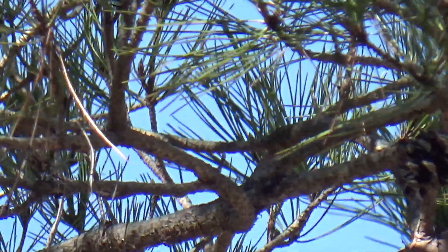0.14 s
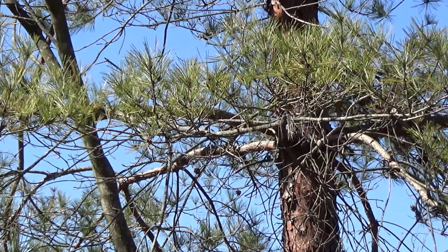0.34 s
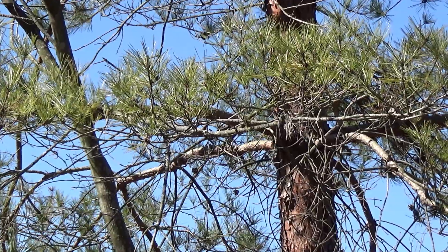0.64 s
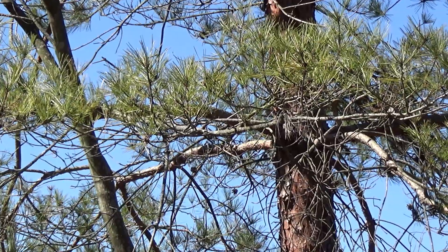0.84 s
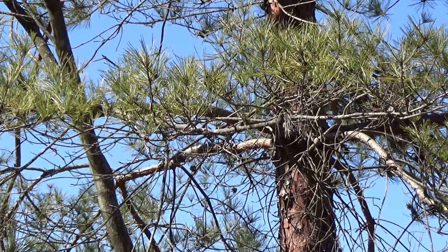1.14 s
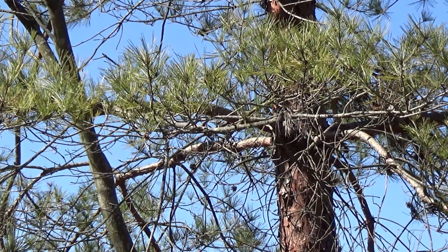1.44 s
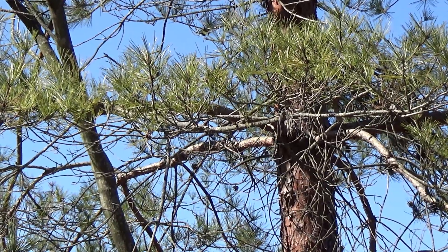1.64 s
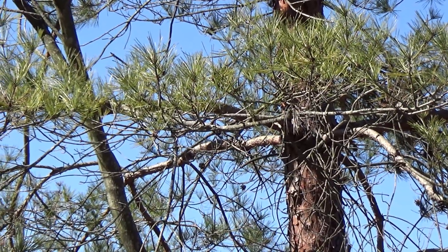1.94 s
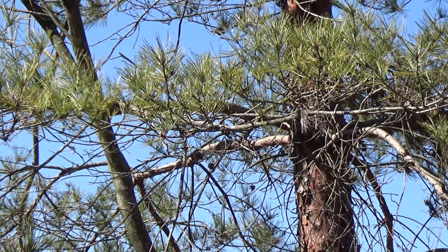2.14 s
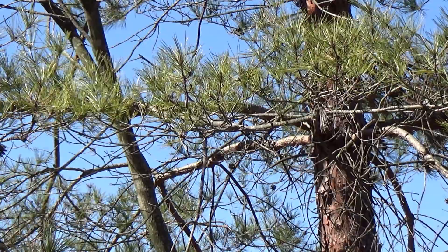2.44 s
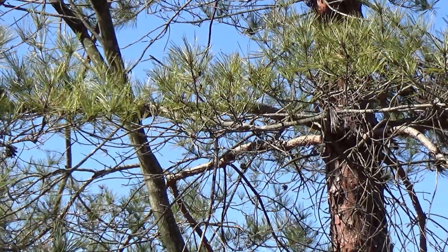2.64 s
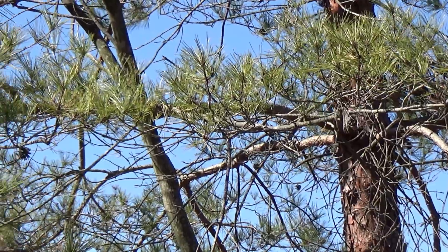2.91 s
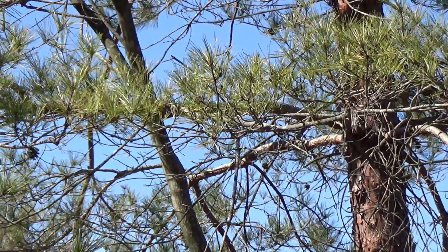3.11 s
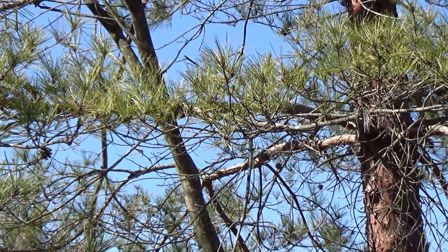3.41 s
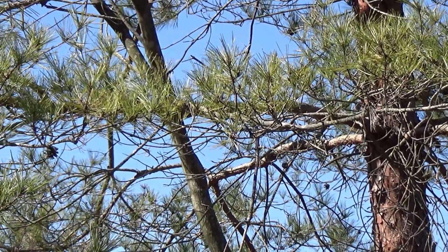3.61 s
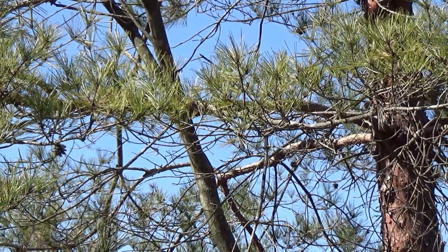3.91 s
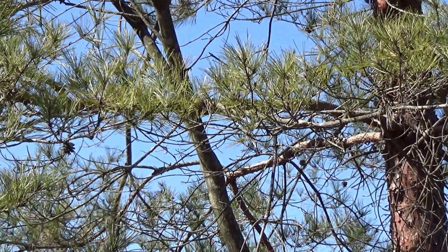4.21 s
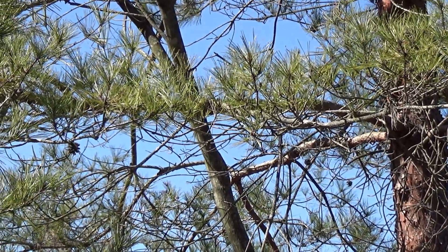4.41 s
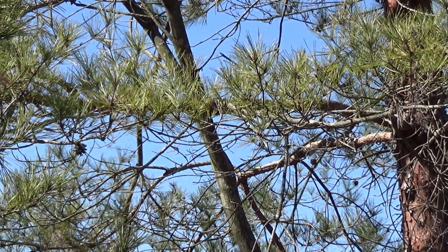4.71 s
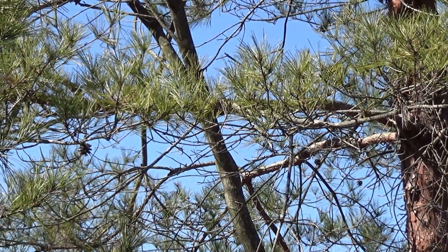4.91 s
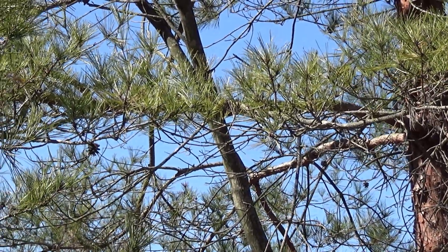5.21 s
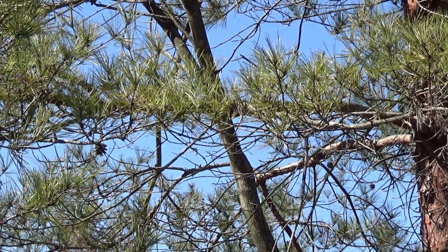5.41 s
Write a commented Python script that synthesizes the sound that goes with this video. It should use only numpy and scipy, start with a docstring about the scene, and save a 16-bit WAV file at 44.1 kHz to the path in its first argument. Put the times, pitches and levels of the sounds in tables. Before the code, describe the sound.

Tiny birds trade rough, very high buzzes and rapid sinking trills outdoors in pines, with thin whistles, faint crackles and a quiet airy background.

```python
"""Long-tailed tits calling in a pine

Two runs of buzzy notes from two fluttering voices, and trills of rising chips, each led by an arched note.
Thin gliding whistles, and one short slide up into an arched note, share the left side with the buzzes; fainter
trills and wavering tones come from further off. Trunks and boughs answer with spaced echoes and a decaying
noise tail. Needles rustle and crackle, and twigs tick as short noise bursts, over a soft roar of coloured
noise. A quarter second of silence comes first."""
import sys
import numpy as np
from scipy import signal
from scipy.fft import rfft, irfft
from scipy.io import wavfile
from scipy.ndimage import uniform_filter1d

SR = 44100
rng = np.random.default_rng(int(sys.argv[2]) if len(sys.argv) > 2 else 0)


def dump(signal):
    """Clip the signal to [-1, 1] and save it as 16-bit WAV at the path in sys.argv[1]."""
    limited = np.clip(np.atleast_2d(signal).T, -1, 1)
    pcm = np.round(limited * 32767).astype(np.int16)
    wavfile.write(sys.argv[1], SR, pcm)


N = 244755
TIME = np.arange(N) / SR  # s

# colour of the rustling needles: [f/Hz, relative level per Hz/dB]
RUSTLE_COLOUR = [(2000, -8), (4500, -7), (6500, -2.5), (8500, 3), (10000, -3), (12500, -11.5), (15700, -20)]
# how strongly the needles stir: [t/s, level/dB]
STIR_LEVEL = [(.3, -74), (1.1, -69.5), (1.5, -81), (2.5, -60.5), (3.4, -61.5), (4.9, -62.5), (5.15, -56),
              (5.32, -56), (5.5, -63.5)]


def amp(db):
    """Decibels to gain."""
    return 10 ** (np.asarray(db) / 20)


def evened(x):
    """Scales to an rms of one."""
    return x / np.sqrt(np.mean(x ** 2) + 1e-20)


def read(points, hz):
    """Reads a spectrum on a log-frequency axis."""
    f, value = np.transpose(points)
    return np.interp(np.log(hz + 1), np.log(f + 1), value)


def coloured(x, spectrum):
    """Filters a sound by a spectrum in dB."""
    gain = amp(read(spectrum, np.fft.rfftfreq(N, 1 / SR)))
    return irfft(rfft(x) * gain, N)


def level(curve):
    """Turns a curve of dB over time into a gain for every sample."""
    return amp(np.interp(TIME, *np.transpose(curve)))


def add(mix, s, sound):
    """Adds a sound into the mix at time s."""
    part = mix[round(s * SR):][:len(sound)]
    part += sound[:len(part)]


def wander(rate_hz):
    """Smooth random drift of rms one; a Gaussian low-pass thins it out above the rate."""
    hz = np.fft.rfftfreq(N, 1 / SR)
    spectrum = rfft(rng.standard_normal(N)) * np.exp(-(hz / rate_hz) ** 2)
    return evened(irfft(spectrum, N))


def progress(length):
    """Runs from 0 to 1 over a note of the given seconds."""
    return np.linspace(0, 1, round(length * SR))


def ramp(u, share):
    """Falls from 1 to 0 over the first share of a note, then stays at 0."""
    return np.maximum(1 - u / share, 0)


def tone(hz, overtone_db):
    """One side of the syrinx: almost a sine, with a trace of its octave."""
    phase = 2 * np.pi * np.cumsum(hz) / SR
    return np.sqrt(2) * (np.sin(phase) + amp(overtone_db) * np.sin(2 * phase))


def noise(spectrum, patchy_db):
    """Coloured stereo noise with drifting patches in time and pitch; bass and top are nearly mono."""
    # likeness of the two channels: [f/Hz, left-right correlation]
    likeness = [(60, .999), (125, 1), (250, 0.99), (500, 0.93), (1000, 0.77), (2000, 0.38), (4000, 0.52),
                (8000, 0.88), (12000, 1)]
    frames, hz = N // 256 + 5, np.fft.rfftfreq(1024, 1 / SR)
    a, b, c, d, patches = rng.standard_normal((5, frames, len(hz))).transpose(0, 2, 1)
    patches = uniform_filter1d(patches, size=14, axis=0)
    patches = evened(uniform_filter1d(patches, size=14, axis=1))
    same = np.clip(read(likeness, hz), -1, 1)[:, None]
    left = a + 1j * b
    right = same * left + np.sqrt(1 - same ** 2) * (c + 1j * d)
    z = np.array([left, right]) * amp(patchy_db * patches)
    white = signal.istft(z, nperseg=1024, noverlap=768)[1][:, :N]
    return evened(coloured(white, spectrum))


def outdoors(hiss_db=-66, crackle_db=2):
    """Distant roar, faint hiss, unevenly rustling needles and soft low thumps, all shaped from noise."""
    # colours of roar, hiss and thumps: [f/Hz, relative level per Hz/dB]
    roar_colour, hiss_colour, rumble_colour = [(15, -55), (25, -24), (122, -10.5), (215, -9.5), (354, -5.5),
                                               (450, -5), (501, -3.5), (680, -0.5), (741, -1.5), (882, -2),
                                               (1690, -9), (2200, -15.5), (2610, -14.5), (4500, -23),
                                               (5850, -33), (9900, -120)], [(2500, -16), (4300, -3), (6000, -2), (9000, -1),
                                                            (12000, -8.5), (15700, -7.5)], [(30, -35), (70, -9), (120, -7),
                                                                          (280, -4), (500, -39)]
    # strength of the distant roar: [t/s, level/dB]
    roar_level = [(.3, -57.5), (1.1, -56), (1.6, -57), (3.5, -55), (4.1, -56.5), (4.7, -56.5), (5.5, -57)]
    # soft low thumps: [t/s at the strongest, half width/s to 1/e, level/dB]
    thumps = [(3.78, 0.15, -71), (4.15, 0.079, -64.5), (4.35, 0.09, -69), (4.59, 0.13, -66)]
    roar = level(roar_level) * noise(roar_colour, patchy_db=0.96)
    hiss = amp(hiss_db) * noise(hiss_colour, patchy_db=2.1)
    uneven = noise(RUSTLE_COLOUR, patchy_db=1.45) * amp(crackle_db * wander(150))
    needles = level(STIR_LEVEL) * evened(uneven)
    swells = sum(amp(db) * np.exp(-((TIME - s) / width) ** 2) for s, width, db in thumps)
    return roar + hiss + needles + swells * noise(rumble_colour, patchy_db=3.0)


def crackles(spread_db=3):
    """Small ticks of the needles: random impulses with a fast decay, stronger the more the needles stir."""
    rate, decay_s, over_stir_db = 20, 0.0016, 3.5  # mean ticks per second; dB over the stirring
    strength = amp(spread_db * np.clip(rng.standard_normal(N), -2, 2))
    snaps = (rng.random(N) < rate / SR) * strength
    fading = signal.lfilter([1], [1, -np.exp(-1 / (decay_s * SR))], snaps)
    grain = evened(coloured(rng.standard_normal(N), RUSTLE_COLOUR))
    return amp(over_stir_db) * level(STIR_LEVEL) * fading * grain


def buzzes(low_sag_hz=60, low_depth=0.97, jitter_hz=38, flutter_jitter=0.015, throb=0.21, flat_top=0.18, edge=0.21):
    """Both sides of the syrinx sing at once, each on its own pitch; a fast flutter shakes both into sidebands."""
    # buzzy notes, nominal pitch and level before flutter and throat:
    # [t/s, length/s, low voice f/Hz, low level/dB, high voice f/Hz, high level/dB, climb of both voices/Hz]
    buzz_notes = [(.318, .12, 7300, -53, 8030, -50.5, -52), (.497, .099, 7480, -51.5, 8340, -46, 302),
                  (0.663, 0.091, 7750, -50.5, 8620, -44, 142), (.823, 0.09, 7930, -50, 8610, -47.5, 140),
                  (.988, 0.079, 8070, -51, 8680, -49, 132), (2.085, .13, 8080, -52.5, 8826, -52, 81),
                  (2.288, 0.12, 8020, -51.5, 8960, -43, 170), (2.472, .13, 8000, -50, 9090, -47, 42),
                  (2.665, 0.13, 8040, -49.5, 9150, -48, 71), (2.855, 0.13, 8060, -48.5, 9140, -46.5, 30),
                  (3.088, .092, 8120, -47.5, 8980, -49, 20)]
    # throat of the buzzing bird: [f/Hz, gain/dB]
    throat = [(5500, -16), (6800, 0), (7300, -2.5), (8950, 0), (9350, -8.5), (9800, -19), (11000, -20)]
    flutter_hz = 343  # mean rate
    easy_hz, depth_hz = 8780, 313  # at this pitch the high voice runs straight and the flutter is this deep
    depth_per_hz, arch_per_hz = 0.099, 0.25  # higher notes flutter deeper and arch; lower ones sag in the middle
    scoop_hz, scoop_s = 450, 0.00392  # each note slides in from below and drops at its end
    out, drift, shake_low, shake_high = np.zeros(N), wander(90), wander(340), wander(310)
    for s, length, low_hz, low_db, high_hz, high_db, climb_hz in buzz_notes:
        u = progress(length)
        at = round(s * SR) + np.arange(len(u))
        cycle = 2 * np.pi * np.cumsum(flutter_hz * (1 + flutter_jitter * drift[at])) / SR
        flutter = np.sin(cycle) + flat_top * np.cos(2 * cycle)
        strain_hz = high_hz - easy_hz
        swing = (depth_hz + depth_per_hz * strain_hz) * flutter
        bow = (2 * u - 1) ** 2  # 1 at both ends, 0 in the middle
        scoop = scoop_hz * np.exp(-np.minimum(u, 1 - u) * length / scoop_s)
        glide = climb_hz * (u - .5) - scoop
        low_pitch = low_hz + glide + low_sag_hz * bow + low_depth * swing + jitter_hz * shake_low[at]
        high_pitch = high_hz + glide - arch_per_hz * strain_hz * bow + swing + jitter_hz * shake_high[at]
        low = amp(low_db) * tone(low_pitch, overtone_db=-42)
        high = amp(high_db) * tone(high_pitch, overtone_db=-40)
        throbbing = (low + high) * (1 + throb * flutter)
        add(out, s, throbbing * signal.windows.tukey(len(u), edge))
    return coloured(out, throat)


def ticks(octaves=0.32):
    """Each tick of a twig or needle is a decaying burst of noise around its own pitch."""
    # the clearest ticks: [t/s, level/dB before the decay, centre f/Hz, decay time constant/s]
    tick_list = [(.431, -57, 6800, .005), (1.079, -56.5, 6500, .011), (3.812, -53, 2880, 0.0037),
                 (4.197, -50.5, 7610, 0.0023), (4.392, -50, 8950, .0037), (4.498, -51, 9100, .0036),
                 (4.661, -52.5, 2960, 0.0059), (4.663, -52, 8700, 0.024), (5.364, -48.5, 7350, .0047)]
    out, t = np.zeros(N), TIME[:4096]
    hz = np.fft.rfftfreq(len(t), 1 / SR) + 1
    for s, db, centre_hz, fade in tick_list:
        resonance = 1 / (1 + (np.log2(hz / centre_hz) / octaves) ** 2)
        burst = irfft(rfft(rng.standard_normal(len(t))) * resonance)
        add(out, s, amp(db) * evened(burst) * np.exp(-t / fade))
    return out


def far_calls(waver=0.0091):
    """Faint far-off tones whose pitch wavers at random, almost lost in the distant roar."""
    # far-off calls: [t/s, length/s, mean f/Hz, level/dB before the trees]
    call_notes = [(0.87, 0.18, 1680, -72), (1.02, 0.1, 847, -63.5), (1.152, 0.13, 1690, -73),
                  (4.238, 0.23, 1303, -69), (4.621, 0.28, 1277, -70.5)]
    out, shake = np.zeros(N), wander(65)
    for s, length, hz, db in call_notes:
        pitch = hz * (1 + waver * shake[round(s * SR):][:round(length * SR)])
        add(out, s, amp(db) * tone(pitch, overtone_db=-36) * signal.windows.tukey(len(pitch), .5))
    return out


def lead(length, hz, arch, shake, hold_db=-1.5):
    """A clear note that swells as it climbs to a peak, steps down, holds and falls away."""
    # pitch course of an arched note: [share of its length, pitch factor]
    arch_course = [(0, .94), (.08, .99), (.29, 1.018), (.44, 1.055), (.56, .99), (.85, 1.003), (1, .91)]
    start_db, attack, end_db, release = -13.5, 0.32, -12.5, 0.13  # dB against the hold; times as shares of length
    u = progress(length)
    course = uniform_filter1d(np.interp(u, *np.transpose(arch_course)), size=90)
    pitch = hz * course ** arch * (1 + shake[:len(u)])
    db = hold_db + start_db * ramp(u, attack) + end_db * ramp(1 - u, release)
    return amp(db) * tone(pitch, overtone_db=-36) * signal.windows.tukey(len(u), .08)


def chip(top_hz, swell_db, overtone_db, shake, edge=0.29):
    """A quick upward sweep, easing off towards its top pitch, then hooking down."""
    sweep_depth, sweep_share, sweep_curve = 0.19, .78, 1.364  # depth below the top pitch; share of the length
    hook_depth, hook_share = .05, 0.17
    u = progress(.029)  # length in s
    sweep = sweep_depth * ramp(u, sweep_share) ** sweep_curve
    hook = hook_depth * ramp(1 - u, hook_share) ** 2
    pitch = top_hz * (1 - sweep - hook) * (1 + shake[:len(u)])
    return amp(swell_db * (u - .5)) * tone(pitch, overtone_db) * signal.windows.tukey(len(u), edge)


def trills(lead_jitter=0.004, chip_jitter=0.01, bend=0.0028):
    """Arched notes, and paced chips whose top pitch sinks; returns the near birds and the faint far ones."""
    # arched notes, alone or leading a trill:
    # [t/s, length/s, nominal f/Hz, nominal level/dB, exponent on the arch (height)]
    lead_notes = [(1.649, 0.083, 7320, -34.5, 1.5), (2.360, 0.071, 6730, -39.5, .4),
                  (3.034, .078, 7620, -45, 1.3), (3.293, .075, 7360, -52.5, 1), (3.393, 0.08, 6860, -31, 1),
                  (3.517, 0.077, 7140, -49, .75), (3.757, 0.062, 7130, -55, 1),
                  (4.264, 0.074, 7100, -52.5, 1), (4.576, 0.079, 6730, -36.5, .85)]
    # trills, levels before the beak: [t/s, number of chips, chip spacing/s, chips before the bird hesitates or 0,
    # first f/Hz, last f/Hz, first level/dB, last level/dB, swell within a chip/dB, octave overtone/dB]
    trill_list = [(1.751, 9, 0.054, 0, 6990, 6470, -42.5, -39, 7.5, -27),
                  (2.443, 2, .054, 0, 6600, 6260, -42, -41.5, 2, -21.5),
                  (3.135, 3, 0.053, 2, 7170, 6680, -57.5, -57, 15, -30),
                  (3.496, 7, 0.056, 3, 6670, 6240, -37.5, -42.5, -1.5, -25.5),
                  (4.351, 2, .051, 0, 6750, 6500, -61, -62, 3, -30),
                  (4.675, 4, .0562, 0, 6370, 6250, -44, -42, -1, -30)]
    # beak of the trilling birds: [f/Hz, gain/dB]
    beak = [(4500, -10), (6000, -0.5), (12400, -2), (13200, -9), (14000, -12)]
    far_below_db = -47  # notes weaker than this come from the birds further off
    hesitation_s, last_late_s = .0092, .004  # the closing chip of a trill lags
    plateau = 0.69  # pitch falls most at the two ends of a trill: 0 = evenly, 1 = level in the middle
    swell_loss_db = 6.5  # from first chip to last, the weight moves towards the start of the chip
    out, shake = np.zeros((2, N)), wander(200)
    bent = chip_jitter * shake + bend * wander(40)
    for s, length, hz, db, arch in lead_notes:
        note = lead(length, hz, arch, lead_jitter * shake[round(s * SR):])
        add(out[int(db < far_below_db)], s, amp(db) * note)
    for start, count, gap, hesitates, first_hz, last_hz, first_db, last_db, swell_db, overtone_db in trill_list:
        for k, place in enumerate(np.linspace(-1, 1, round(count))):
            pause = hesitation_s * (0 < round(hesitates) <= k)
            s = start + k * gap + pause + last_late_s * (place == 1)
            fall = (1 - plateau) * place + plateau * place ** 3
            hz = np.interp(fall, [-1, 1], [first_hz, last_hz])
            db = np.interp(place, [-1, 1], [first_db, last_db])
            swell = swell_db - swell_loss_db * place / 2
            note = chip(hz, swell, overtone_db, bent[round(s * SR):])
            add(out[int(db < far_below_db)], s, amp(db) * note)
    return [coloured(birds, beak) for birds in out]


def thin_glides(jitter_hz=18):
    """Thin near-sine tones that swell and fade: gliding whistles, and one short slide up into an arched note."""
    # gliding whistles, and at 2.339 s the short upward slide into the arched note at 2.36 s:
    # [t/s, length/s, starting f/Hz, glide/Hz, level/dB before the trees]
    glide_notes = [(2.174, .2, 8950, -120, -58), (2.339, 0.032, 5700, 1050, -46.5),
                   (2.56, 0.6, 8750, -85, -67), (2.72, 0.19, 8270, -170, -54.5),
                   (2.902, 0.43, 8150, -50, -62), (3.307, .28, 8130, -220, -63)]
    out, shake = np.zeros(N), wander(80)
    for s, length, hz, glide_hz, db in glide_notes:
        u = progress(length)
        pitch = hz + glide_hz * u ** 2 + jitter_hz * shake[round(s * SR):][:len(u)]  # glides ever faster
        add(out, s, amp(db) * tone(pitch, overtone_db=-35) * signal.windows.tukey(len(u), .5))
    return out


def among_trees(x, left_db, lead_turns, bough_db, wood_db, t60):
    """The direct call, its near echoes, and a diffuse tail scattered by the wood."""
    # echoes off trunk and boughs: [delay t/s, level/dB before bough_db]
    boughs = [(.0031, -11.5), (.0074, -9.5), (0.0107, -14), (.0143, -9.5), (.0225, -20), (.031, -29)]
    # colour of what the wood throws back: [f/Hz, gain/dB]
    scatter_colour = [(4500, -8), (5600, -6), (6400, -1), (9000, 0), (14000, -9)]
    near, thrown = x.copy(), coloured(x, scatter_colour)
    for delay, db in boughs:
        add(near, delay, amp(db + bough_db) * thrown)
    turn = np.exp(2j * np.pi * lead_turns)  # phase lead of the left channel, in turns
    left = amp(left_db / 2) * (signal.hilbert(near) * turn).real
    pair = np.array([left, amp(-left_db / 2) * near])
    t = TIME[:SR]
    scatter = rng.standard_normal(SR) + 0.94 * rng.standard_normal((2, SR))  # partly shared by both channels
    tail = scatter * amp(-60 * t / t60) * (1 - np.exp(-t / 0.004))
    tail = tail / np.linalg.norm(tail[0])
    return pair + amp(wood_db) * signal.fftconvolve(thrown[None], tail, axes=1)[:, :N]


def scene():
    """A buzzing bird to the left, trilling birds ahead and further off, and the wood around them."""
    near_birds, far_birds = trills()
    front = near_birds + ticks() + crackles()
    distant = amp(-2.5) * far_birds + far_calls()
    side = buzzes() + thin_glides()
    ahead = among_trees(front, left_db=-0.2, lead_turns=0.03, bough_db=2.0, wood_db=-9, t60=0.42)
    behind = among_trees(distant, left_db=5.5, lead_turns=.01, bough_db=3, wood_db=-6, t60=0.39)
    left = among_trees(side, left_db=3.5, lead_turns=-0.046, bough_db=-0.5, wood_db=-10.5, t60=0.51)
    return ahead + behind + left + outdoors()


def record(dry):
    """A quick fade-in after the opening silence, then a steep low-pass."""
    edge_hz = 15690
    opening = np.clip((TIME - .255) / 0.04, 0, 1) ** 2
    low_pass = signal.firwin(701, edge_hz, window=("kaiser", 9), fs=SR)
    return signal.oaconvolve(dry * opening, low_pass[None], "same")


dry = scene()
out = record(dry)
dump(out)
```